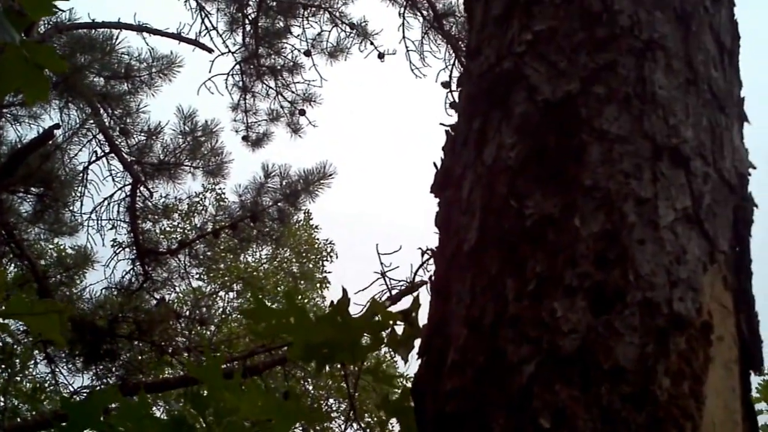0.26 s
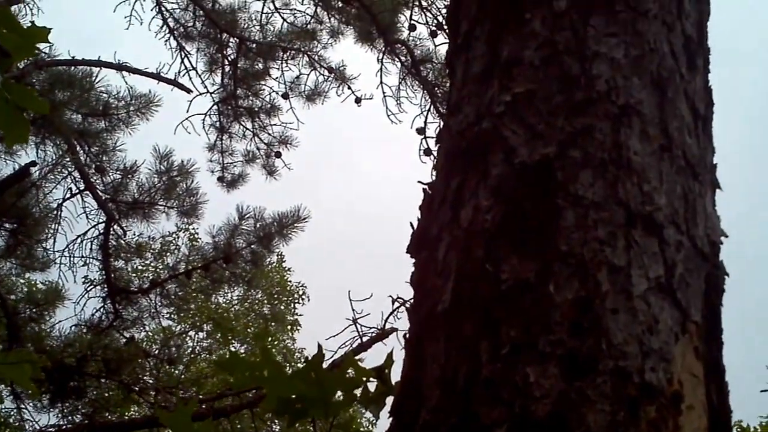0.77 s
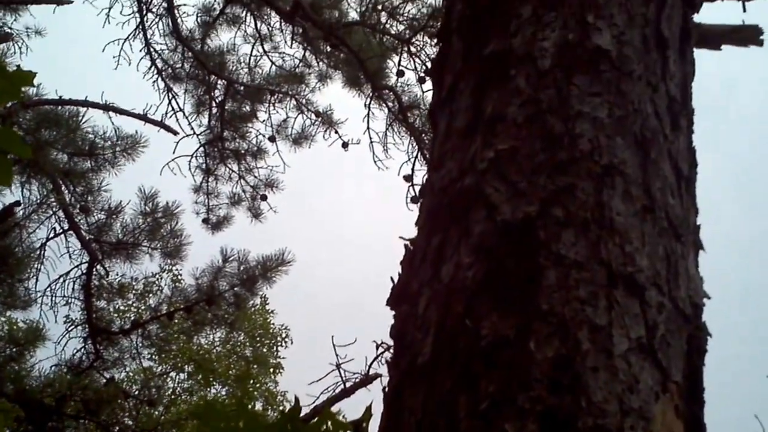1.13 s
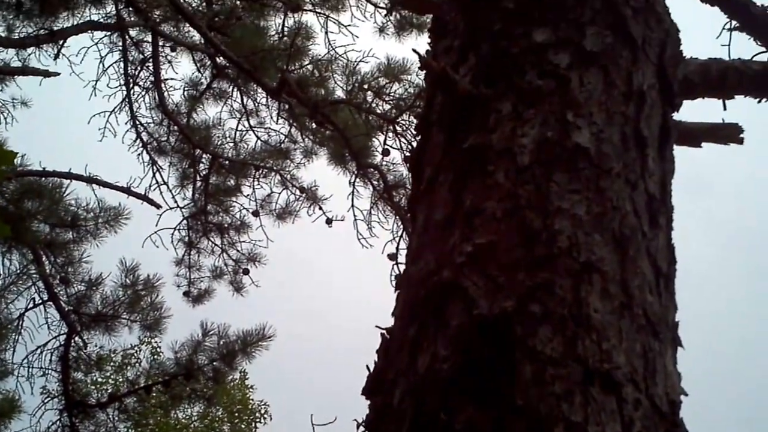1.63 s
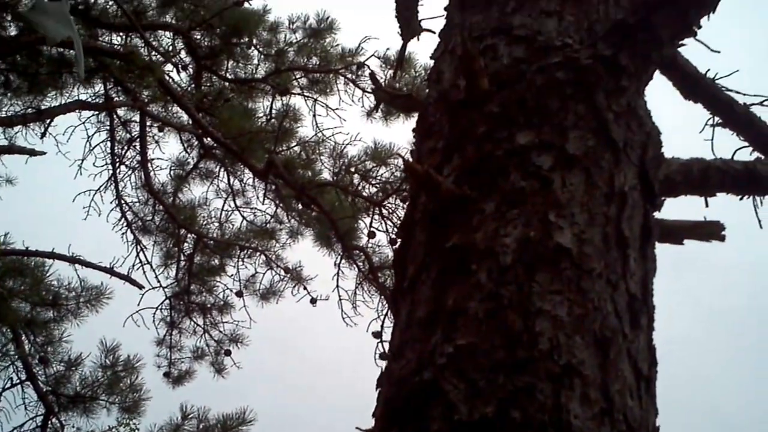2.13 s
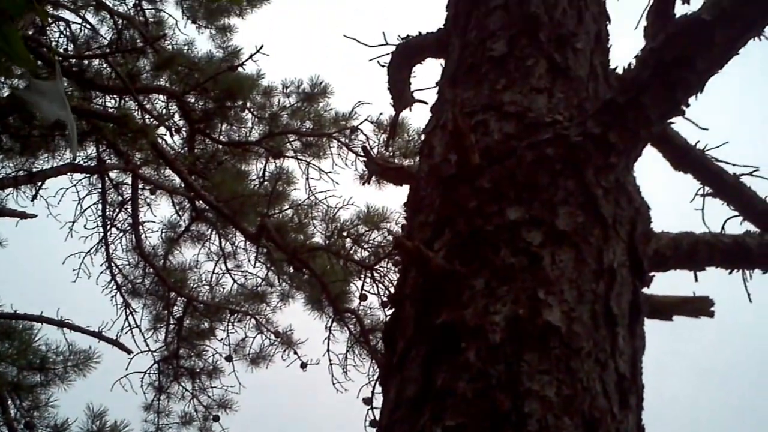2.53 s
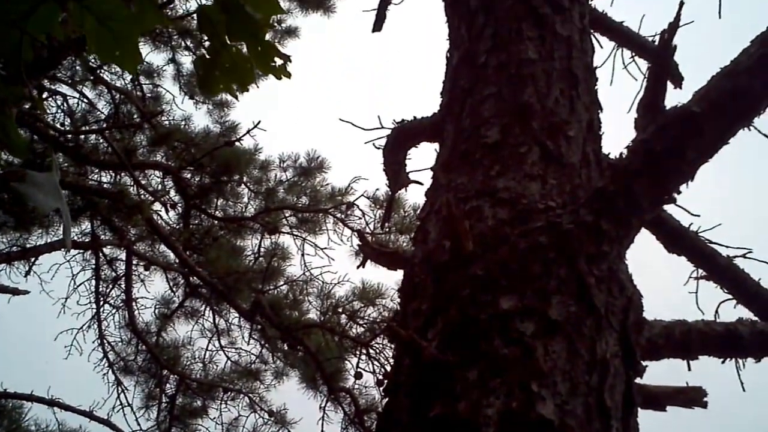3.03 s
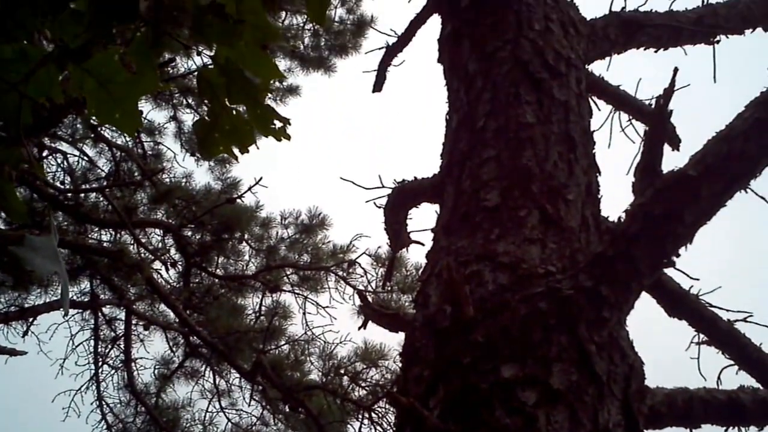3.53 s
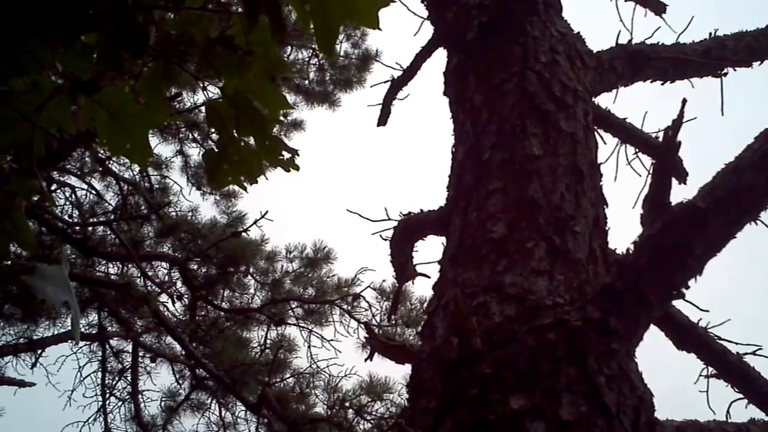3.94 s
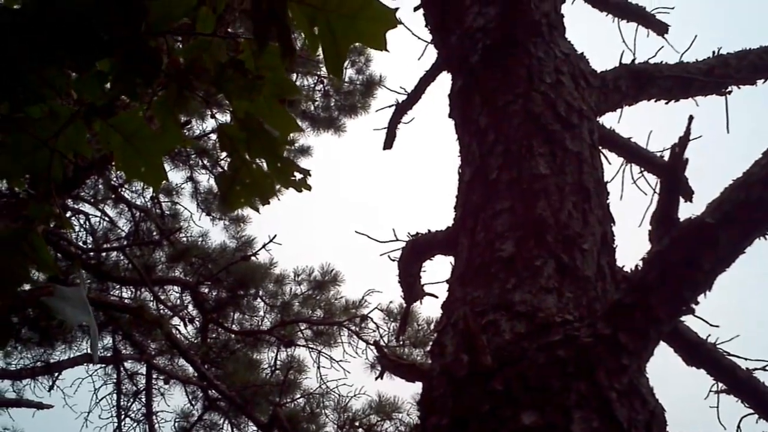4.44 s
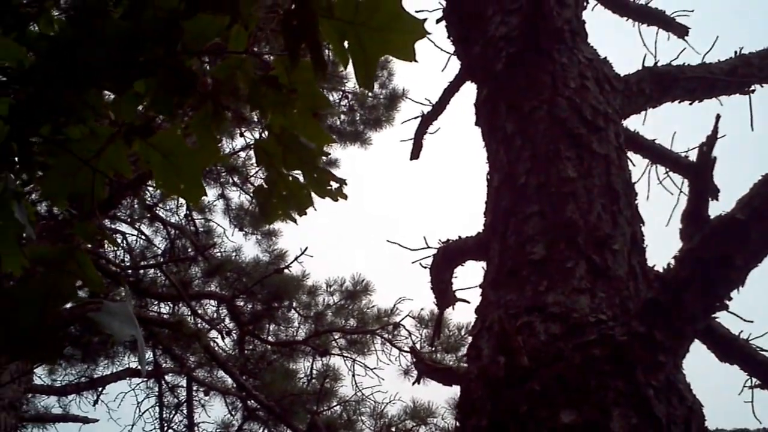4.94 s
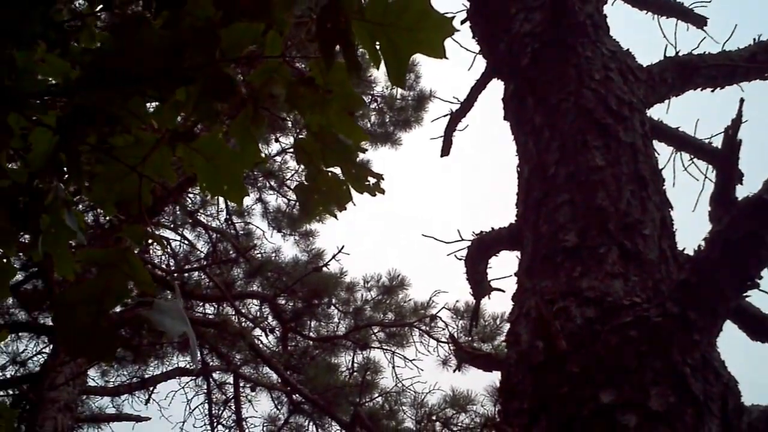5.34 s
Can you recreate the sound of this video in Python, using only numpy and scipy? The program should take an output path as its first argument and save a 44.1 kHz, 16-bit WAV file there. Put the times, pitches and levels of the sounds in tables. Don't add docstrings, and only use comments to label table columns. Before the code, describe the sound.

Under a tall pine, a cicada's song is already in full buzz at the start: a shrill, dense rasp made of very rapid clicks, about 380 per second, brightest around 7 to 9 kHz. It rises slightly and is loudest from about 0.3 to 0.7 s. Then the pace sags quickly until about 1.3 s and more slowly afterwards, while the level falls in small steps. A short, dry twig snap ticks at about 0.9 s. From 1.5 to 3 s the buzz is softer, looser and grainier; by 4 s it is a weak, uneven sizzle, nearly gone at 5.6 s. Branches blur it with short diffuse echoes, and moving air makes it flutter. Beneath lie low distant traffic, soft breeze rumble, hiss and a faint, steady, very high whine of far insects, this bed also sinking over the first few seconds. Wide stereo from a small handheld device.

```python
import sys
import numpy as np
from scipy import signal
from scipy.fft import rfft, irfft
from scipy.io import wavfile
from scipy.ndimage import uniform_filter1d

SR = 44100
rng = np.random.default_rng(int(sys.argv[2]) if len(sys.argv) > 2 else 0)


def file_out(sig):
    cols = np.atleast_2d(sig).T
    lim = np.clip(cols, -1, 1)
    pcm = np.round(lim * 32767).astype(np.int16)
    wavfile.write(sys.argv[1], SR, pcm)


def magnitude_from_level(level_db):
    exponent = np.asarray(level_db, float) / 20
    return 10 ** exponent


N = 246519
SECONDS = np.arange(N) / SR


def curve(table):
    times, values = np.transpose(table)
    return np.interp(SECONDS, times, values)


def unit(x):
    return x / np.sqrt(np.mean(x ** 2))


def even(x):
    return x / np.sqrt(uniform_filter1d(x ** 2, int(0.058 * SR)) + 1e-18)


def walk(rate_hz):
    hold = int(SR / rate_hz)
    steps = np.repeat(rng.standard_normal(N // hold + 1), hold)
    smooth = uniform_filter1d(uniform_filter1d(steps, hold), hold)
    return unit(smooth[:N])


def ring(x, modes):
    out = 0
    for hz, width_hz, db in modes:
        b, a = signal.iirpeak(hz, hz / width_hz, fs=SR)
        once = signal.lfilter(b, a, x)
        out = out + magnitude_from_level(db) * signal.lfilter(b, a, once)
    return out


def clicks(times, sizes):
    place = times[:, None] * SR
    index = np.floor(place).astype(int) + np.arange(-11, 13)
    offset = index - place
    shape = np.sinc(offset) * np.cos(np.pi * offset / 24) ** 2
    return np.bincount(np.clip(index, 0, N - 1).ravel(), (sizes[:, None] * shape).ravel(), N)


def coloured(spectrum):
    hz = np.fft.rfftfreq(N, 1 / SR) + 1
    at_hz, db = np.transpose(spectrum)
    level_db = np.interp(np.log(hz), np.log(at_hz), db)
    return irfft(rfft(rng.standard_normal(N)) * magnitude_from_level(level_db), N) * np.sqrt(SR / 2)


def tiring(muscle_hz):
    sag = np.maximum(190.28 - muscle_hz, 0)
    drop = uniform_filter1d(np.gradient(sag) * SR, SR // 10)
    gap_ms = 1.315 + 0.19 * (1 - np.exp(-sag / 16))
    lag = 0.0007 * np.maximum(drop - 11, 0) + 0.012 * np.clip((sag - 18) / 10, 0, 1)
    slack = np.clip(0.055 + (sag / 28.7) ** 1.9, 0, 1)
    falter_us = 44 * np.maximum(SECONDS - 4.2, 0)
    scatter_us = 3.4 + 0.54 * sag + falter_us
    out_size = np.clip(0.24 + 0.45 * (sag / 40) ** 2, 0, 1)
    return gap_ms, lag, slack, scatter_us, out_size


def tymbals(muscle_hz, gap_ms, lag, scatter_us, out_size):
    cycles = np.cumsum(muscle_hz) / SR
    stroke = np.arange(int(2 * cycles[-1]) - 1)
    at = np.interp(stroke / 2, cycles, np.arange(N)).astype(int)
    second = stroke % 2
    jitter, strength, gap_jitter, pop = rng.standard_normal((4, len(stroke)))
    start = np.interp(stroke / 2 + second * lag[at], cycles, SECONDS) + scatter_us[at] * jitter / 1e6
    end = start + gap_ms[at] / 1000 + 4.0 * gap_jitter / 1e6
    size = magnitude_from_level(-2.5 * second + 0.35 * strength)
    return clicks(start, size) - clicks(end, size * out_size[at] * magnitude_from_level(1.8 * pop))


def branches(x, t60_s, first_ms):
    t = np.arange(int(t60_s * SR)) / SR
    out = 0
    for _ in range(5):
        tail = rng.standard_normal(len(t)) * magnitude_from_level(-60 * t / t60_s) * (t > first_ms / 1000)
        echoes = signal.fftconvolve(x, tail / np.linalg.norm(tail))[:N]
        out = out + walk(1.602) * echoes
    return even(out)


# f/Hz, tense level/dB, slack level/dB
ABDOMEN_TONE = [(2960, -50, -54), (4300, -47, -28.5), (5140, -34, -18), (5394, -17.5, -10),
                (6640, -15.5, -2), (7370, -2.5, 1.5), (7940, 2, -3), (8760, -4.5, 4.5), (9200, -3.5, -11.5),
                (10100, -14, -16.5), (10480, -22.5, -14.5), (12700, -27, -22.5), (13800, -36, -32),
                (15200, -73, -42)]
# f/Hz, delay/ms
RING_DELAY = [(5000, 0), (7000, 1.0), (8000, 2.4), (9200, 1.3), (10300, 2.9), (12000, .6), (14000, 2.2)]


def abdomen(x, column):
    hz = np.fft.rfftfreq(N, 1 / SR)
    tone = np.array(ABDOMEN_TONE)
    level_db = np.interp(hz, tone[:, 0], tone[:, column])
    delay_s = np.interp(hz, *np.transpose(RING_DELAY)) / 1000
    phase = 2 * np.pi * np.cumsum(delay_s) * SR / N
    return irfft(rfft(x) * magnitude_from_level(level_db) * np.exp(-1j * phase), N)


# t/s, level/dB
SONG_LEVEL = [(0.0, -37.5), (0.26, -34), (0.34, -35.5), (0.39, -32.5), (0.67, -33), (1.17, -40),
              (1.4, -40.5), (1.49, -39.5), (1.73, -42.5), (2.69, -48), (2.71, -46.5), (2.99, -52.5),
              (3.52, -52), (4.53, -57.5), (5.36, -60), (5.59, -67)]
# t/s, f/Hz
MUSCLE_RATE = [(0, 190.22), (.32, 190.28), (.52, 189.88), (.62, 189.4), (.72, 188.2), (.82, 185.9),
               (.92, 183.25), (1.02, 180.93), (1.12, 179.51), (1.34, 177.04), (1.62, 174.88), (2.04, 171.9),
               (2.46, 169.5), (3.02, 166.55), (3.58, 163.95), (4.28, 160.85), (5.59, 157.4)]


def cicada():
    muscle_hz = curve(MUSCLE_RATE)
    gap_ms, lag, slack, scatter_us, out_size = tiring(muscle_hz)
    buckle = tymbals(muscle_hz, gap_ms, lag, scatter_us, out_size)
    heard = unit(buckle) + magnitude_from_level(-3.5) * branches(buckle, t60_s=0.15, first_ms=1.2)
    tense = abdomen(heard, column=1)
    relaxed = abdomen(heard, column=2)
    song = even((1 - slack) * tense + slack * relaxed)
    flutter_db = 0.52 * walk(24.94)
    return magnitude_from_level(curve(SONG_LEVEL) + 3 + flutter_db) * song


def turn_down():
    return 8.7 * np.exp(-(SECONDS / 2.21) ** 2.27)


# f/Hz, width/Hz, level/dB
FAR_INSECTS = [(14340, 70, -79), (14530, 55, -78.5)]


def far_insects():
    out = 0
    for hz, width_hz, db in FAR_INSECTS:
        band = ring(rng.standard_normal(N), [(hz, width_hz, 0)])
        out = out + magnitude_from_level(db) * unit(band)
    return out


# f/Hz, level/dB per Hz
TRAFFIC_AND_HISS = [(30, -112), (80, -95.5), (170, -90), (400, -101), (800, -100), (1400, -106),
                    (2500, -108), (3600, -110), (4700, -115), (6500, -108), (10500, -105), (12500, -106),
                    (14000, -113), (15500, -110)]


def background():
    level_db = turn_down() + 0.55 * walk(3)
    return magnitude_from_level(level_db) * (coloured(TRAFFIC_AND_HISS) + far_insects())


# f/Hz, level/dB per Hz
PORT_BREEZE = [(30, -118), (60, -110), (110, -95.5), (180, -91.5), (400, -97), (800, -108), (1100, -125),
               (18000, -135)]
# f/Hz, level/dB per Hz
GUST = [(30, -125), (200, -104), (350, -103), (600, -99.5), (900, -102), (1100, -122), (18000, -135)]


def breeze():
    left = magnitude_from_level(1.0) * coloured(PORT_BREEZE)
    right = magnitude_from_level(-1.4) * coloured(PORT_BREEZE)
    gust = coloured(GUST)
    return np.array([left + gust, right - gust]) * magnitude_from_level(turn_down())


# t/s, level/dB
TWIG_SNAPS = [(.922, -43.5)]


def twig():
    times, db = np.transpose(TWIG_SNAPS)
    return ring(clicks(times, magnitude_from_level(db) * 10), [(2300, 660, 0), (4100, 900, 0)])


def scene():
    port_level = magnitude_from_level(np.array([[-0.4], [0.4]]))
    return cicada() * port_level + background() + breeze() + twig()


def roll_off(x):
    return signal.sosfilt(signal.butter(12, 15920, fs=SR, output="sos"), x)


def record(dry):
    pair = np.array([dry[0], -np.roll(dry[1], 15)])
    top_cut = signal.ellip(10, 0.2, 60, 15680, fs=SR, output="sos")
    return roll_off(signal.sosfilt(top_cut, pair))


dry = scene()
out = record(dry)
file_out(out)
```